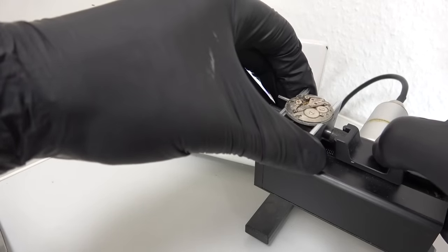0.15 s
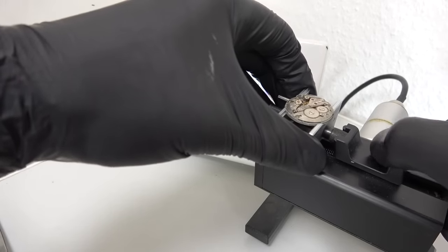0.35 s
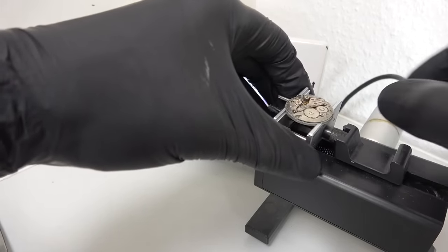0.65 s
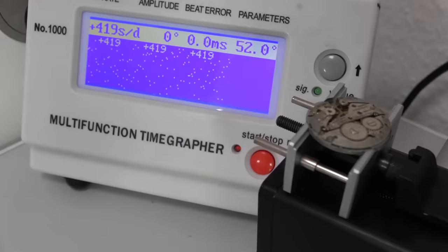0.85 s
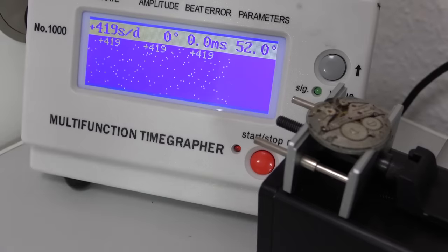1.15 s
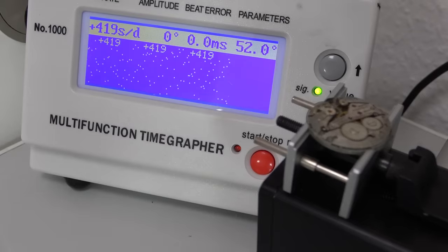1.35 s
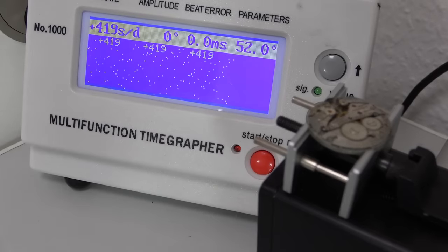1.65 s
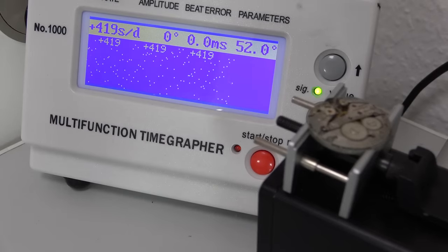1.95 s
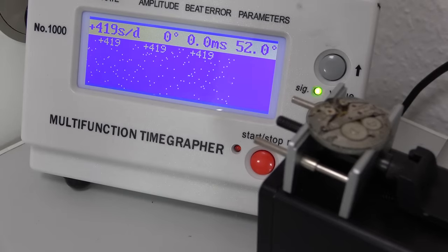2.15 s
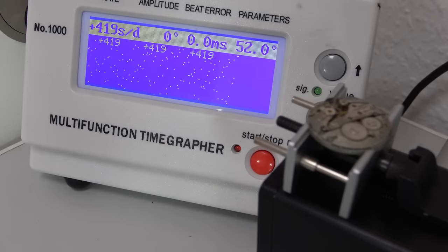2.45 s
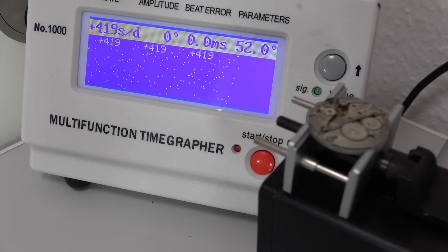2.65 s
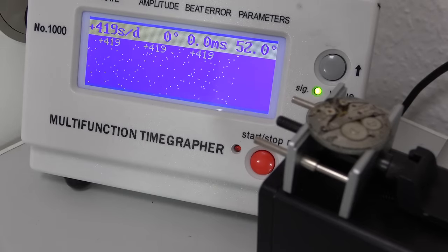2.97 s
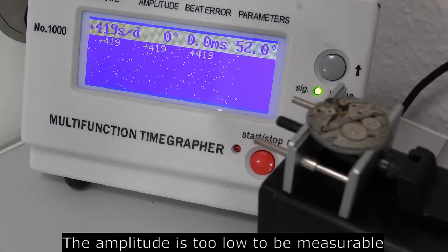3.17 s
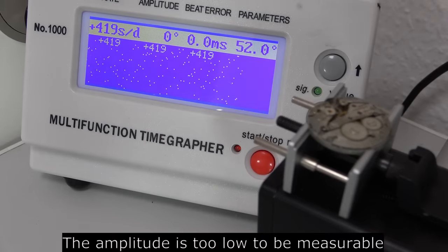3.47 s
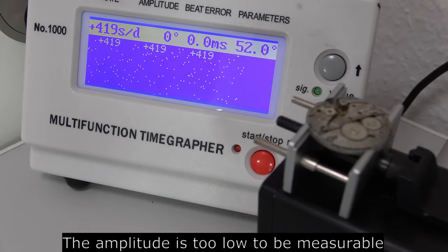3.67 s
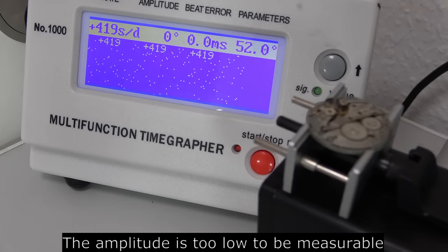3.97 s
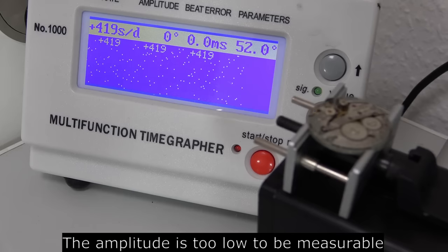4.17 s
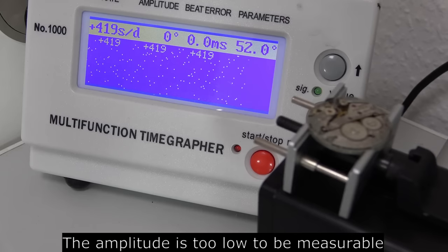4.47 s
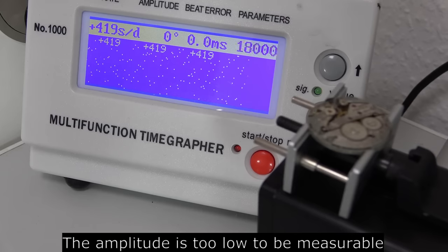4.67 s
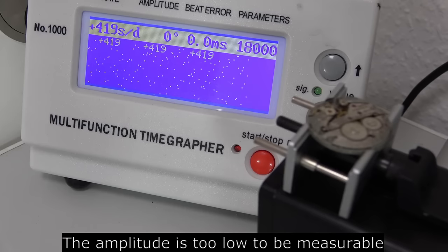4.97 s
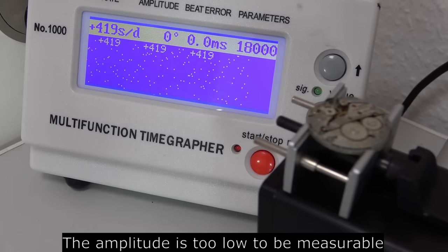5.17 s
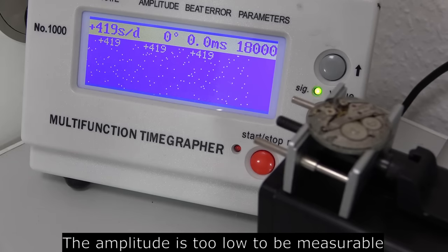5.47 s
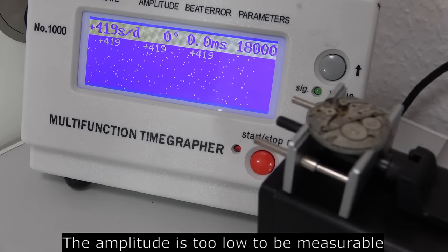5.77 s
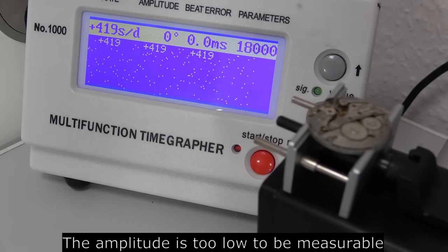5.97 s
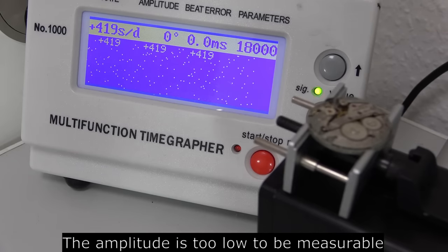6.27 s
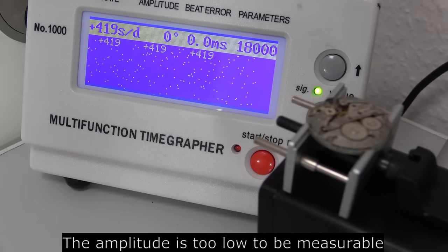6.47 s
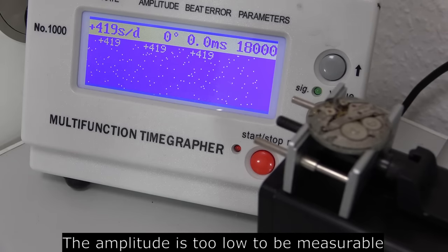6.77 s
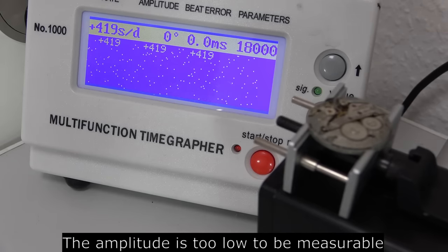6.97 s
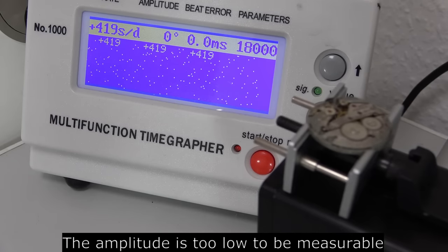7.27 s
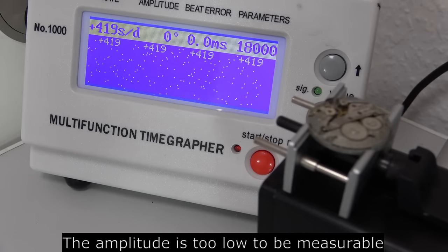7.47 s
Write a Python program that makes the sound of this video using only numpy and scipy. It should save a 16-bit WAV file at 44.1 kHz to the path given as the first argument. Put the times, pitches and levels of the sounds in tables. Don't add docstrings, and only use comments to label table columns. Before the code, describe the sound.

First, close handling: a sudden glove grab, a metal clamp snapping shut, dry plastic ticks, a faint rubber squeal and a soft rumble of the bench. Then only the tester's piezo-like clicking remains, even and unhurried, every click the same, ringing briefly off the bench and walls. Very faint high metallic ticks from the watch movement sit beside each click over low room air and thin hum.

```python
import sys
import numpy as np
from scipy import signal
from scipy.fft import rfft, irfft
from scipy.io import wavfile
from scipy.ndimage import uniform_filter1d

SR = 44100
rng = np.random.default_rng(int(sys.argv[2]) if len(sys.argv) > 2 else 0)


def voltage_ratio(decibels):
    exponent = np.asarray(decibels, float) / 20
    return 10 ** exponent


def wrap_up_sound(samples):
    columns = np.atleast_2d(samples).T
    tamed = np.clip(columns, -1, 1)
    steps = np.round(tamed * 32767).astype(np.int16)
    wavfile.write(sys.argv[1], SR, steps)


N = 336042
CHANGE_S = 0.7805

# frequency in Hz, level in dB per Hz.
AIR_COLOUR = [(10, -2), (25, -3), (40, 3.5), (60, 1.5), (100, -5.5), (257, -1.5), (440, -11), (640, -12),
              (810, -10), (1100, -17.5), (1430, -36), (2400, -90)]
# centre in Hz, width in Hz, level in dB.
HUMS = [(126, 16, -70.5), (162.7, 13, -71), (280, 15, -71), (505, 14, -80), (1555, 80, -71)]
# frequency in Hz, level in dB per Hz.
HISS_COLOUR = [(600, -13), (1200, 13.5), (1850, 0.5), (2400, 2.5), (6000, -2), (10000, -3.5), (15000, -8.5)]
# crest in seconds, crest level in dB, ring in Hz, rise and fall in dB per second.
ROCKS = [
    (.187, -32, 16.4, 70, 58),
    (.699, -40.5, 15.4, 150, 42),
    (1.02, -53, 12, 150, 60),
    (.075, -45, 45, 250, 250),
]
# full at in seconds, held in seconds, level in dB,
# rise and fall in dB per second.
STROKES = [
    (.032, 0.043, -59.5, 3002, 400),
    (.46, .01, -75, 56, 200),
    (.52, .01, -56.5, 250, 55),
    (.736, .004, -62, 500, 120),
]
# full at in seconds, held in seconds, level in dB, rise and fall in dB per second.
SQUEAKS = [
    (.031, .03, -65, 3000, 900),
    (.52, .01, -66, 130, 40),
]
# frequency in Hz, level in dB per Hz.
RUB_COLOUR = [(1500, -5), (2500, -2), (4000, -4), (5500, -1), (8800, -2), (9900, -3), (11000, -17),
              (13000, -16)]
# start in seconds, peak in dB, ring in Hz, ring level in dB relative to the snap,
# ring t60 in seconds.
GLOVE_CLICKS = [
    (.0345, -49, 8500, -23, .03),
    (0.0375, -40, 347, -1.5, 0.024),
    (0.081, -49, 5300, 0, .01),
    (0.185, -53, 5500, -20, .01),
    (.423, -54, 8500, -4, .01),
    (.565, -65.5, 353, 19, 0.056),
    (.603, -47.5, 2600, 4.5, 0.018),
    (0.628, -43.5, 5750, -19, .2),
    (0.682, -49, 2200, -2, .01),
    (.731, -47.5, 1800, -3, 0.023),
]
# frequency in Hz, level in dB, t60 in seconds.
CLAMP_MODES = [(1180, -17, 0.062), (1500, 1, 0.034), (1530, -26, 0.34), (2200, -7, 0.0078), (3640, 1, 0.01)]
# frequency in Hz, level in dB per Hz.
CLAMP_CRACK = [(1500, 1), (2300, -3), (3700, 2), (6500, -4.5), (9500, -14), (11000, -31), (13800, -12),
               (16000, -30)]
# sounder click in seconds, wheel lock after it in ms, lock level in dB.
SWINGS_FORTH = [(.757, 46.5, -54), (1.1828, 33.6, -57), (1.5892, 36.9, -51), (2.00261, 30.6, -52),
                (2.41141, 27.3, -54), (2.81621, 40.3, -56), (3.23601, 29.7, -59), (3.64661, 40.3, -56),
                (4.07341, 35.2, -52), (4.49101, 24.9, -52), (4.90081, 32.9, -54), (5.31301, 24.0, -51),
                (5.72061, 26.7, -54), (6.12421, 35.9, -54), (6.53861, 29.7, -54), (6.94602, 34.6, -52),
                (7.36181, 27.5, -56)]
# sounder click in seconds, wheel lock after it in ms, lock level in dB.
SWINGS_BACK = [(.9826, 41.8, -56), (1.3992, 35.1, -60), (1.8088, 37.3, -57), (2.21721, 26.3, -54),
               (2.62401, 38.0, -59), (3.03881, 37.4, -53), (3.42441, 61.3, -60), (3.87161, 48.5, -49),
               (4.26541, 61.8, -49), (4.70421, 28.1, -60), (5.11741, 32.6, -50), (5.52481, 23.0, -51),
               (5.92761, 36.8, -60), (6.34441, 31.3, -56), (6.75081, 32.4, -56), (7.16282, 34.3, -51),
               (7.57582, 30.8, -61)]
# frequency in Hz, level in dB per Hz.
WALL_COLOUR = [(1650, -31), (2150, -5), (2370, 5.5), (2560, -3), (2950, -14.5), (3450, -26), (3950, -16),
               (4600, -8.5), (5000, -6.5), (5450, -25), (7300, -32), (11300, -43), (12500, -33),
               (13800, -60)]
# frequency in Hz, t60 in seconds.
WALL_T60 = [(1000, 0.33), (2400, 0.51), (4600, 0.42), (8000, 0.22), (14000, 0.37)]
# frequency in Hz, level in dB, t60 in seconds, polarity.
DISC_MODES = [(2523, -4.4, 0.0162, -1), (4523, -13.8, 0.0312, 1)]
# frequency in Hz, level in dB, t60 in seconds, polarity.
HOUSING_MODES = [(610, -43, 0.022, 1), (1274, -41.5, 0.053, 1), (2072, -18, 0.012, -1),
                 (3062, -19.5, 0.014, 1), (3840, -20, 0.022, 1), (5415, -27.5, 0.014, -1),
                 (6100, -93, 0.021, 1), (7510, -36, 0.022, -1), (8580, -39.5, 0.034, -1),
                 (11800, -64.5, 0.0026, -1), (12740, -45.5, 0.021, -1), (14200, -61.9, 0.018, -1)]
# delay in ms, gain.
PATHS = [(0.09, -0.06), (0.9, 0.122), (1.125, -0.111), (1.605, -0.486), (1.695, -0.186), (2.925, -0.11),
         (3.285, -0.291), (3.465, 0.105), (3.75, -0.21), (4.02, 0.255), (4.62, -0.314), (4.68, 0.18),
         (4.875, 0.309), (5.265, 0.15), (5.595, -0.251), (5.775, -0.125), (6.12, 0.184), (6.9, 0.102),
         (7.245, -0.136), (9.39, -0.092), (10.035, -0.092), (10.515, 0.068), (11.145, 0.056)]
# frequency in Hz, level in dB per Hz.
PANEL_BUZZ = [(4000, -11), (5800, -4.5), (6600, -13.5), (8000, -8.5), (9400, -9), (10300, -20.5),
              (11500, -4.5), (12700, 1), (13400, -8), (14300, -26), (16000, -34)]
# frequency in Hz, level in dB per Hz.
STAND_KNOCK = [(250, -26), (450, -12), (750, -16), (1120, -57), (1280, -37), (1450, 8.5), (1650, 3),
               (1880, 21), (2050, -35), (3400, 4), (4000, -35), (4950, -56), (5600, -16)]


def evened(x):
    return x / np.sqrt(np.mean(x ** 2) + 1e-20)


def read(points, hz):
    f, value = np.transpose(points)
    return np.interp(np.log(hz + 1), np.log(f + 1), value)


def add(mix, s, sound):
    part = mix[round(s * SR):][:len(sound)]
    part += sound[:len(part)]


def decay(db, t60, t):
    return voltage_ratio(db - 60 * t / t60)


def coloured(points, size):
    colour = voltage_ratio(read(points, np.fft.rfftfreq(size, 1 / SR)))
    return evened(irfft(rfft(rng.standard_normal(size)) * colour, size))


def band(x, lo_hz, hi_hz):
    return signal.sosfilt(signal.butter(2, [lo_hz, hi_hz], "band", fs=SR, output="sos"), x)


def burst(points, db, t60, rise_s):
    t = np.arange(2600) / SR
    return coloured(points, len(t)) * decay(db, t60, t) * np.clip(t / rise_s, 0, 1)


def swell(s, hold_s, db, rise, fall):
    t = np.arange(N) / SR - s
    return voltage_ratio(db - rise * np.maximum(-t, 0) - fall * np.maximum(t - hold_s, 0))


def impulses(seconds, gains, size):
    margin, near = 16, np.arange(-16, 17)
    out = np.zeros(size + 64)
    for place, gain in zip(seconds * SR + margin, gains):
        out[round(place) + near] += gain * np.sinc(near + round(place) - place) * np.hanning(len(near))
    return out[margin:size + margin]


def workshop(air_db=-59.5, hiss_db=-68, whine_hz=713.5, whine_db=-67.5, waver_hz=1.45, waver_db=0.5):
    f = np.fft.rfftfreq(N, 1 / SR)
    out = voltage_ratio(air_db) * coloured(AIR_COLOUR, N) + voltage_ratio(hiss_db) * coloured(HISS_COLOUR, N)
    for hz, width_hz, db in HUMS:
        resonance = 1 / (1 + (2 * (f - hz) / width_hz) ** 2)
        out += voltage_ratio(db) * evened(irfft(rfft(rng.standard_normal(N)) * resonance, N))
    slow = uniform_filter1d(rng.standard_normal((2, N)), 3000)
    pitch_waver, level_waver = evened(uniform_filter1d(slow, 3000))
    turns = np.cumsum(whine_hz + waver_hz * pitch_waver) / SR
    return out + np.sqrt(2) * voltage_ratio(whine_db + waver_db * level_waver) * np.sin(2 * np.pi * turns)


def bench(push_hz=14.1):
    out, t = np.zeros(N), np.arange(N) / SR
    for k, (s, db, hz, rise, fall) in enumerate(ROCKS):
        rocking = np.cos(2 * np.pi * np.where(t < s, push_hz, hz) * (t - s))
        out += (-1) ** k * swell(s, 0, db, rise, fall) * rocking
    return out


def glove_clicks(snap_t60=0.021):
    out, t = np.zeros(N), np.arange(6000) / SR
    for s, db, hz, ring_db, ring_t60 in GLOVE_CLICKS:
        puff = rng.standard_normal(len(t)) * decay(0, snap_t60, t)
        snap = band(puff, 1600, max(6000, 1.5 * hz))
        ring = decay(ring_db, ring_t60, t) * np.sin(2 * np.pi * hz * t)
        add(out, s, voltage_ratio(db) * (snap / abs(snap).max() + ring))
    return out


def clamp(shut_s=0.0732, ring_db=-34.5):
    out, t = np.zeros(N), np.arange(6000) / SR
    for hz, db, t60 in CLAMP_MODES:
        add(out, shut_s, decay(ring_db + db, t60, t) * np.sin(2 * np.pi * hz * t))
    add(out, shut_s, burst(CLAMP_CRACK, db=-28, t60=0.0097, rise_s=0.00024))
    return out


def glove_rub(grit_db=1.5):
    grit = voltage_ratio(grit_db * evened(uniform_filter1d(rng.standard_normal(N), 150)))
    squeal = evened(band(rng.standard_normal(N), 11800, 14700))
    rub = sum(swell(*row) for row in STROKES) * coloured(RUB_COLOUR, N)
    return grit * (rub + sum(swell(*row) for row in SQUEAKS) * squeal)


def hands(room_db=-38, room_t60=0.29):
    out, t = glove_clicks() + clamp(), np.arange(6000) / SR
    room = band(rng.standard_normal(len(t)), 530, 2800) * decay(room_db, room_t60, t)
    out += signal.oaconvolve(out, room)[:N]
    return (out + glove_rub()) * (np.arange(N) < CHANGE_S * SR)


def tick(shape, bright_db, dull_db):
    puff = rng.standard_normal(len(shape)) * shape
    bright, dull = band(puff, 12200, 15900), band(puff, 7000, 8600)
    return voltage_ratio(bright_db) * bright / abs(bright).max() + voltage_ratio(dull_db) * dull / abs(dull).max()


def escapement(t60=0.007, tail_db=-19, tail_t60=0.094, bright_lift_db=3, dull_lift_db=5, scatter_db=2.5):
    answer_s, impulse_s = 0.0281, 0.017
    limp_ms, limp_db = 55, 15
    out, t = np.zeros(N), np.arange(1500) / SR
    shape = (decay(0, t60, t) + decay(tail_db, tail_t60, t)) * np.clip(t / 0.00069, 0, 1)
    for click_s, lock_ms, lock_db in SWINGS_FORTH + SWINGS_BACK:
        lock_s = click_s + lock_ms / 1000
        unlock_off, impulse_off, *dull_offs = scatter_db * rng.standard_normal(5)
        unlock_db = -63 + unlock_off - limp_db * (lock_ms > limp_ms)
        snaps = [(click_s - answer_s, unlock_db), (lock_s - impulse_s, -71 + impulse_off), (lock_s, lock_db)]
        for (s, db), dull_off in zip(snaps, dull_offs):
            add(out, s, tick(shape, db + bright_lift_db, db - 6 + dull_off + dull_lift_db))
    return out * (np.arange(N) > CHANGE_S * SR)


def walls(level_db=-38, first_s=0.0039, rise_s=0.0025):
    t = np.arange(SR // 2) / SR
    hz, frame_s, z = signal.stft(coloured(WALL_COLOUR, len(t)), SR, nperseg=256)
    fading = z * decay(0, read(WALL_T60, hz)[:, None], frame_s)
    tail = signal.istft(fading, SR, nperseg=256)[1][:len(t)]
    return voltage_ratio(level_db) * tail * np.clip((t - first_s) / rise_s, 0, 1)


def sounder():
    out, t = np.zeros(2600), np.arange(2600) / SR
    for hz, db, t60, polarity in DISC_MODES:
        out += polarity * decay(db, t60, t) * 1000 * t * np.cos(2 * np.pi * hz * t)
    for hz, db, t60, polarity in HOUSING_MODES:
        out += polarity * decay(db, t60, t) * np.sin(2 * np.pi * hz * t)
    return out


def tester_click():
    ms, gains = np.transpose(PATHS)
    click = np.convolve(impulses(ms / 1000, gains, size=800), sounder())
    add(click, 0.0018, voltage_ratio(3) * burst(PANEL_BUZZ, db=-43.5, t60=0.02, rise_s=0.001))
    add(click, 0.0016, burst(STAND_KNOCK, db=-40, t60=0.064, rise_s=0.0042))
    return signal.sosfilt(signal.butter(8, 14300, fs=SR, output="sos"), click)


def tester(drift=0.15, nearer_db=0.06):
    beats = np.sort(np.transpose(SWINGS_FORTH + SWINGS_BACK)[0])
    since = beats - beats.mean()
    levels = voltage_ratio(nearer_db * np.maximum(since, 0))
    out = signal.oaconvolve(impulses(beats, levels, size=N), tester_click())[:N]
    for share in (np.cos(drift * since), np.sin(drift * since)):
        out += signal.oaconvolve(impulses(beats, share, size=N), walls())[:N]
    return out * (np.arange(N) > CHANGE_S * SR)


def scene():
    return (tester() + escapement() + hands() + bench() + workshop())[None]


def low_pass(x):
    return signal.sosfilt(signal.butter(12, 16470, fs=SR, output="sos"), x)


def record(dry):
    edge = signal.firwin(511, 15820, window=("kaiser", 9), fs=SR)
    return low_pass(signal.oaconvolve(dry, edge[None], "same"))


dry = scene()
out = record(dry)
wrap_up_sound(out)
```